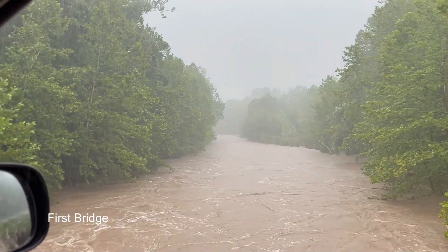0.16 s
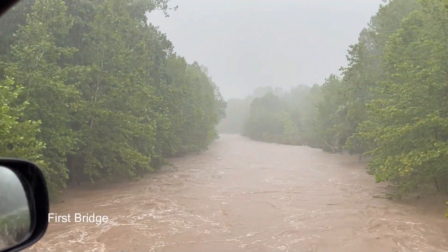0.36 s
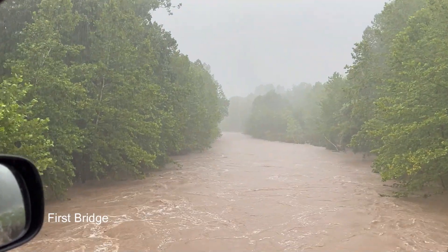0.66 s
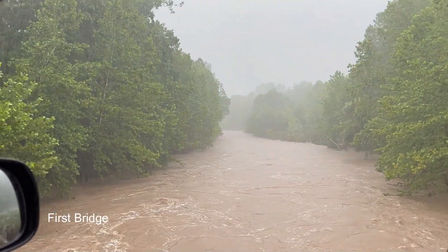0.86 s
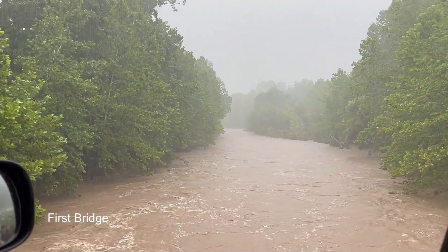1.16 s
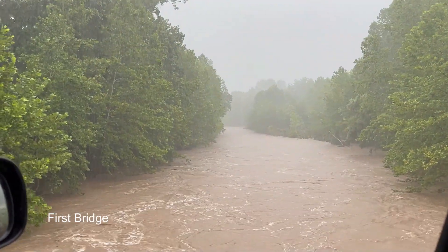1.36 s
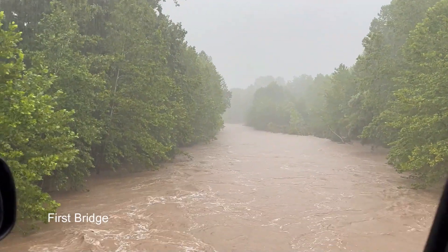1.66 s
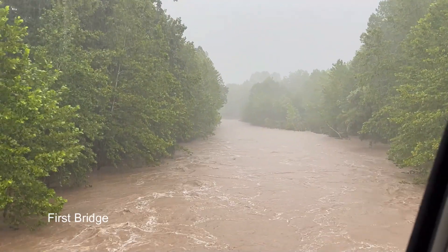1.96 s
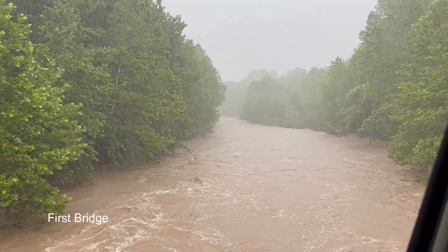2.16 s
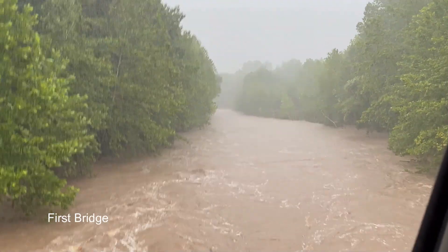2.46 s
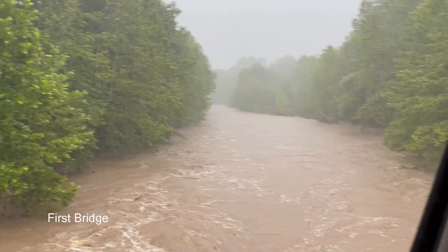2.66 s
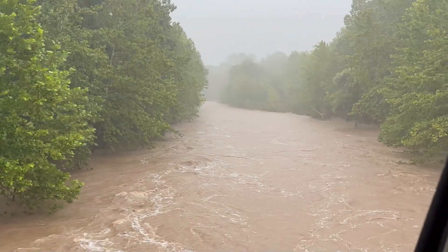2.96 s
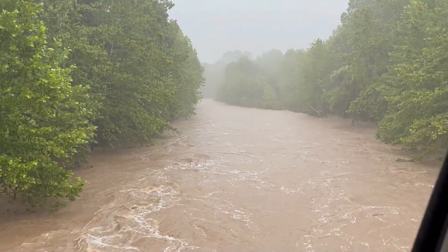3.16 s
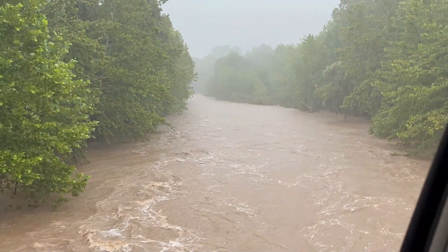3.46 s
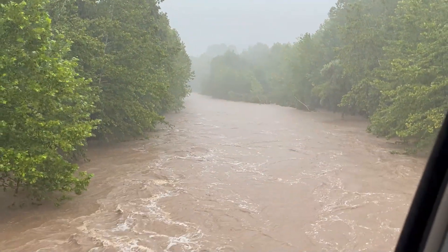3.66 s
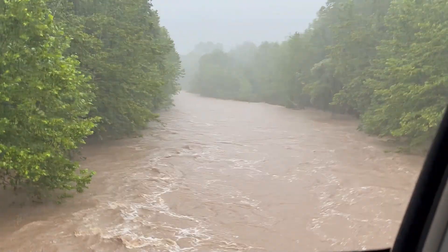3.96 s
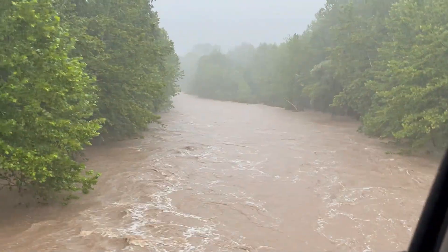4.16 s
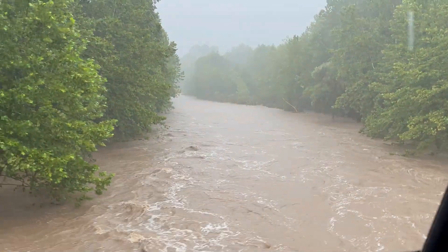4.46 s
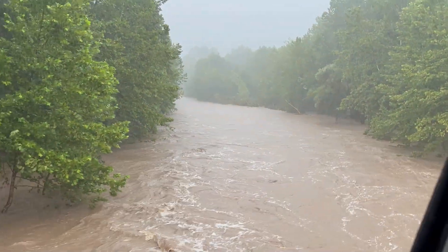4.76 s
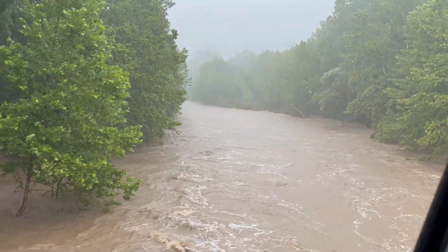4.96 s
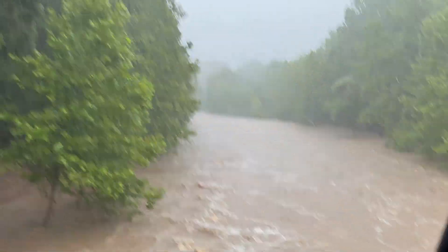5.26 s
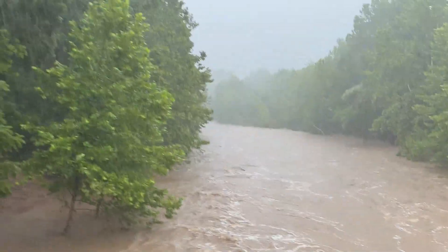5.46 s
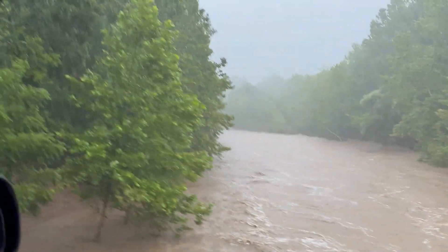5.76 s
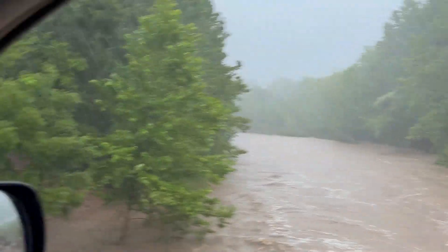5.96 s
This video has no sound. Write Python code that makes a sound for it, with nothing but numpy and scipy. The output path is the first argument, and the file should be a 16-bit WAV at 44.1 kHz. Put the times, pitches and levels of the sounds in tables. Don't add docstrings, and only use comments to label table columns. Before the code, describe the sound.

A swollen creek roars steadily under heavy hissing rain while wind booms through an open car window and big drops knock on the door.

```python
import sys
import numpy as np
from scipy import signal
from scipy.fft import rfft, irfft, next_fast_len
from scipy.io import wavfile
from scipy.ndimage import uniform_filter1d

SR = 44100
rng = np.random.default_rng(int(sys.argv[2]) if len(sys.argv) > 2 else 0)


def log_audio(samples):
    frames = np.atleast_2d(samples).T
    limited = np.clip(frames, -1, 1)
    pcm = np.round(limited * 32767).astype(np.int16)
    wavfile.write(sys.argv[1], SR, pcm)


def gain_from_db(level_db):
    decades = np.asarray(level_db, float) / 20
    return 10 ** decades


N = 268877
HZ = np.maximum(np.fft.rfftfreq(next_fast_len(N), 1 / SR), 1)
PING = 1200

# centre in Hz, width in Hz, level in dB.
THROB_MODES = [(44.2, 22, -1), (60, 10.7, 0)]
LOW_BOOM_MODES = [(90.3, 36, -1), (117, 15, -2)]
HIGH_BOOM_MODES = [(141.6, 35, 1), (167, 44, 0), (206.5, 23, -6)]
DRUM_MODES = [(239, 200, -1), (347.6, 108, 0), (437, 130, -9), (580, 300, -15.5)]
# time in seconds, level in dB.
AIRFLOW = [(0, -32.5), (.8, -32), (1.4, -35.5), (1.8, -36.5), (2.05, -30.5), (2.5, -36), (3.0, -35),
           (3.14, -31), (3.57, -37), (3.9, -34), (4.13, -28.5), (4.42, -31.5), (4.6, -33.5), (5.3, -39),
           (6.1, -39.5)]
# time in seconds, peak in dB, pitch in Hz, length in seconds.
BUFFETS = [(0.04, -15, 61.5, 0.073), (0.709, -17, 95, 0.024), (0.897, -10, 78, 0.055),
           (0.953, -15.5, 125.6, 0.19), (1.122, -16.5, 71, .09), (1.27, -22.5, 170, 0.13),
           (1.408, -18, 131, 0.064), (1.567, -28, 50, .12), (1.817, -18.5, 128, 0.055),
           (1.897, -22, 50, 0.045), (1.977, -18.5, 121, .08), (2.047, -18.5, 138, 0.12),
           (2.054, -26, 48, 0.15), (2.159, -13, 128, 0.13), (2.425, -26.5, 100, 0.07),
           (2.68, -18, 78, 0.092), (2.843, -23.5, 100, 0.089), (2.96, -21.5, 52, 0.066),
           (3.032, -18.5, 113, 0.035), (3.16, -17, 123, 0.047), (3.368, -24.5, 111.4, 0.13),
           (3.76, -21, 100, 0.12), (3.863, -21.5, 160, 0.13), (3.97, -16, 80, 0.18),
           (4.06, -16, 165, 0.096), (4.102, -20.5, 105, 0.053), (4.5, -21.5, 100, 0.11),
           (5.39, -26, 95, 0.16), (5.655, -19.5, 65, 0.1), (6.064, -20.5, 87, 0.06)]
# time in seconds, level in dB.
DOWNPOUR = [(0, -47), (.04, -45), (.66, -44.5), (2.0, -44.5), (2.2, -43.5), (4.26, -43), (5.0, -43),
            (5.45, -43.5), (6.1, -43.5)]
# frequency in Hz, level in dB per Hz.
CREEK_COLOUR = [(300, -19), (480, -0.5), (600, -4.5), (720, -3.5), (850, -8.5), (1150, -7.5), (1500, -9.5),
                (1950, -11.5), (2300, -16), (3000, -19), (4000, -33.5)]
RAIN_COLOUR = [(900, -14), (1800, -0.5), (2600, 0), (3400, -1.5), (4600, -3), (6000, -2), (7300, -1),
               (8500, -3), (10000, -9.5), (12000, -28)]
SPRAY_COLOUR = [(7000, -13), (9500, -2), (11000, 2), (12500, -0.5), (14300, 3), (15500, 2), (17000, -11)]
# start in seconds, peak in dB, panel in Hz, drip in Hz, drip level in dB.
TAPS = [(0.0486, -13.5, 1190, 2410, -24), (0.672, -26, 1140, 2360, -15), (0.7292, -14, 1060, 3600, -12),
        (0.965, -13.5, 1210, 2310, -18), (1.1628, -15, 1340, 2340, -25), (1.5454, -38, 1150, 2790, -21),
        (3.5528, -24, 1810, 2460, -19), (3.6147, -21, 1240, 2400, -24), (3.925, -10, 1200, 2660, -19),
        (4.2911, -18, 1940, 2400, -7.5), (4.8773, -38, 1330, 2380, -15), (5.5084, -25, 1460, 2580, -24),
        (5.6999, -20, 1200, 2180, -9), (5.8034, -13, 1300, 2470, -17), (5.9716, -12, 930, 2370, -19)]
# start in seconds, peak in dB, pitch in Hz.
TICKS = [
    (0.3785, -40, 8150),
    (0.5791, -25, 6440),
    (2.2822, -25, 13800),
    (2.809, -15, 14300),
    (2.9332, -28, 15000),
    (3.3677, -25, 14300),
    (4.6922, -19, 8650),
    (4.8439, -41, 14600),
    (4.8923, -27, 14500),
    (5.2076, -32, 14700),
]
# centre in seconds, length in seconds, pitch in Hz, level in dB, left minus right in dB.
GURGLES = [(4.257, .05, 1920, -45, -6), (4.35, .05, 1870, -50, -6), (4.497, .1, 1900, -46, 8),
           (5.067, .04, 1340, -41.5, 3), (4.925, 0.05, 1360, -40.5, -8), (0.779, .011, 3600, -49, 0),
           (4.69, .04, 3200, -66, -31), (4.85, .04, 1420, -45, -10), (5.423, 0.082, 1420, -41, -9),
           (5.89, 0.059, 1720, -42, -4), (6.057, .08, 1142, -40, 19)]
# frequency in Hz, likeness from 0 to 1.
LIKENESS = [(35, 0.95), (70, 1), (170, 0.98), (240, 0.81), (320, 0.93), (400, 0.81), (480, 0.86),
            (600, 0.6), (800, 0.59), (1500, 0.063), (2000, 0.76), (2600, 0.82), (4000, 0.77), (7000, 0.98)]
# frequency in Hz, left over right in dB.
LEFT_OVER_RIGHT = [(30, 1), (60, 0), (130, 0.9), (200, 0), (400, -1.3), (800, -2), (1200, -4), (1600, -8),
                   (2000, -7), (2500, 1.5), (4000, 0)]
# frequency in Hz, lead of the left in radians.
LEFT_LEAD = [(1800, 0), (2400, .35), (3200, .8), (4000, .35), (4900, .1), (5800, .45), (6700, .75),
             (7100, 1.4), (7450, 3.14), (7750, 4.3), (8050, 5.5), (8400, 5.85), (8900, 5.4), (11200, 3.14),
             (13700, .75), (14500, 0), (15100, -.55), (16000, -1.5)]

THROB_DB, LOW_BOOM_DB, HIGH_BOOM_DB = -28, -26, -28.5
THROB_FOLLOWS, LOW_FOLLOWS, HIGH_FOLLOWS = 0.3, 0.56, 0.5
BUFFET_OCTAVES = 0.58
CREEK_DB, SPRAY_DB = -39, -47
CREEK_FOLLOWS, SPRAY_FOLLOWS = 0.41, 1.7
CRACK = 0.36
DOOR_SIDE = -0.22
LOW_CUT_HZ, TOP_HZ = 30, 15790


def rms_one(x):
    return x / np.sqrt(np.mean(x ** 2) + 1e-20)


def in_time(rows):
    seconds, level = np.transpose(rows)
    return np.interp(np.arange(N) / SR, seconds, level)


def at_hz(points):
    hz, value = np.transpose(points)
    return np.interp(np.log(HZ), np.log(hz), value)


def shaped(x, response):
    size = next_fast_len(N)
    return irfft(rfft(x, size) * response, size)[..., :N]


def drift(rate_hz):
    return rms_one(shaped(rng.standard_normal(N), 1 / (1 + (HZ / rate_hz) ** 2)))


def cabin_level(calm_db, hz):
    t = np.arange(N) / SR
    power = gain_from_db(2 * calm_db)
    for s, db, pitch_hz, length in BUFFETS:
        reach = (np.log2(pitch_hz / hz) / BUFFET_OCTAVES) ** 2
        swell = ((t - s) / length) ** 2
        power = power + gain_from_db(2 * db) * np.exp(-4 * reach - 4 * swell)
    return 10 * np.log10(power)


def boom(modes, level_db, steady):
    power = sum(gain_from_db(2 * db) / (1 + (2 * (HZ - hz) / width) ** 2) ** 2 for hz, width, db in modes)
    air = rms_one(shaped(rng.standard_normal((2, N)), np.sqrt(power)))
    swing = uniform_filter1d(uniform_filter1d(air[0] ** 2, size=2000), size=2000) + 0.065
    evened = air / swing ** (np.clip(steady, 0, 1) / 2)
    return gain_from_db(level_db) * rms_one(evened)


def cabin_boom():
    drum_db = in_time(AIRFLOW)
    flow = drum_db - drum_db.mean()
    throb_db = cabin_level(THROB_DB + THROB_FOLLOWS * flow, hz=56.4)
    low_db = cabin_level(LOW_BOOM_DB + LOW_FOLLOWS * flow, hz=100)
    high_db = cabin_level(HIGH_BOOM_DB + HIGH_FOLLOWS * flow, hz=160)
    cabin = boom(THROB_MODES, throb_db, steady=0.11)
    cabin += boom(LOW_BOOM_MODES, low_db, steady=0.68)
    cabin += boom(HIGH_BOOM_MODES, high_db, steady=0.35)
    cabin += boom(DRUM_MODES, drum_db + 1.23, steady=0.32)
    eddies_db = 1.14 * drift(14.0)
    return gain_from_db(eddies_db) * cabin


def patter(colour, level_db, span_hz, per_s, spread_db, cycles, smooth, patchy_db, clump_db):
    sizes = gain_from_db(spread_db * np.minimum(rng.exponential(1, (2, N)), 3.5))
    sizes *= rng.choice([-1, 1], (2, N))
    clicks = sizes * (rng.random((2, N)) < per_s / SR) + 1e-18
    pitch_of = rng.integers(0, 12, (2, N))
    grains = 0
    for k, hz in enumerate(np.geomspace(*span_hz, 12)):
        decay, turn = gain_from_db(-60 * hz / cycles / SR), 2 * np.pi * hz / SR
        resonator = [1, -2 * decay * np.cos(turn), decay * decay]
        rings = signal.lfilter([1, 0, -1], resonator, clicks * (pitch_of == k))
        bouts = np.interp(np.arange(N), np.linspace(0, N, 60), rng.standard_normal(60))
        grains = grains + gain_from_db(clump_db * bouts) * np.sqrt(hz) * rms_one(rings)
    wash = smooth * rng.standard_normal((2, N))
    swell = gain_from_db(patchy_db * (drift(13.0) + 0.48 * drift(40.0)))
    coloured = shaped(rms_one(grains) + wash, gain_from_db(at_hz(colour)))
    return gain_from_db(level_db) * rms_one(swell * coloured)


def creek_and_rain():
    rain_db = in_time(DOWNPOUR)
    pour = rain_db - rain_db.mean()
    creek_db = CREEK_DB + CREEK_FOLLOWS * pour
    spray_db = SPRAY_DB + SPRAY_FOLLOWS * pour
    creek = patter(CREEK_COLOUR, creek_db + 2.0, span_hz=(900, 2400), per_s=900, spread_db=2.0,
                   cycles=65.0, smooth=4.57, patchy_db=0.24, clump_db=3.0)
    rain = patter(RAIN_COLOUR, rain_db + 2.0, span_hz=(2200, 9000), per_s=2500, spread_db=2.5,
                  cycles=13.0, smooth=4.4, patchy_db=0.17, clump_db=3.0)
    spray = patter(SPRAY_COLOUR, spray_db + 4.0, span_hz=(9000, 15500), per_s=4000, spread_db=3.5,
                   cycles=16.0, smooth=2.8, patchy_db=0.34, clump_db=4.5)
    squall_db = 0.34 * drift(38.0) + 0.5 * drift(100.0)
    return gain_from_db(squall_db) * (creek + rain + spray)


def ping(hz, cycles):
    turns = np.arange(PING) / SR * hz
    return np.sin(2 * np.pi * turns) * gain_from_db(-60 * turns / cycles) * (1 - np.exp(-turns / 0.6))


def door_taps():
    out = np.zeros((2, N + PING))
    crack = CRACK * sum(ping(hz, cycles=5.0) for hz in np.geomspace(800, 5000, 7))
    for s, db, panel_hz, drip_hz, drip_db in TAPS:
        panel = ping(panel_hz, cycles=16.0) + 0.7 * ping(1.6 * panel_hz, cycles=12.0)
        drip = gain_from_db(drip_db + 4) * ping(drip_hz, cycles=70.0)
        knock = 0.5 * ping(0.67 * panel_hz, cycles=4.2) + 0.45 * ping(2.4 * panel_hz, cycles=12.0)
        start = round(s * SR)
        out[:, start:start + PING] += gain_from_db(db - 8) * (panel + drip + knock + crack) * [[1], [DOOR_SIDE]]
    return out[:, :N]


def splash_ticks():
    out = np.zeros((2, N + PING))
    for s, db, hz in TICKS:
        tick = ping(hz, cycles=22.0) + 0.6 * ping(1.03 * hz, cycles=18.0)
        start = round(s * SR)
        out[0, start:start + PING] += gain_from_db(db - 2.0) * tick
    return out[:, :N]


def gurgles():
    out, t = np.zeros((2, N)), np.arange(N) / SR
    turns_per_hz = np.cumsum(1 + 0.033 * drift(22.3)) / SR
    sputter_db = 2.9 * drift(60.0)
    for s, length, hz, db, pan_db in GURGLES:
        swell = np.exp(-4 * ((t - s) / length) ** 2)
        note = gain_from_db(db + 1.5 + sputter_db) * swell * np.sin(2 * np.pi * hz * turns_per_hz)
        out += np.array([[1], [np.tanh(pan_db / 15)]]) * note
    return out


def ports(shared, apart):
    alike = np.clip(at_hz(LIKENESS), 0, 1)
    mid = shaped(shared, np.sqrt(1 + alike))
    side = shaped(apart, np.sqrt(1 - alike))
    step = gain_from_db(at_hz(LEFT_OVER_RIGHT) / 2) * np.exp(0.5j * at_hz(LEFT_LEAD))
    return np.array([shaped(mid + side, step), shaped(mid - side, 1 / step)]) / np.sqrt(2)


def scene():
    drops = door_taps() + splash_ticks() + gurgles()
    shared, apart = cabin_boom() + creek_and_rain() + drops
    return ports(shared, apart)


def low_pass(x):
    return signal.sosfilt(signal.butter(12, 15870, fs=SR, output="sos"), x)


def record(dry):
    band = (HZ < TOP_HZ) / np.sqrt(1 + (LOW_CUT_HZ / HZ) ** 6)
    return low_pass(shaped(dry, band))


dry = scene()
out = record(dry)
log_audio(out)
```